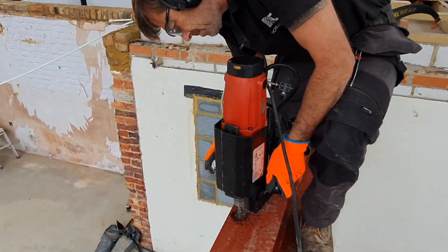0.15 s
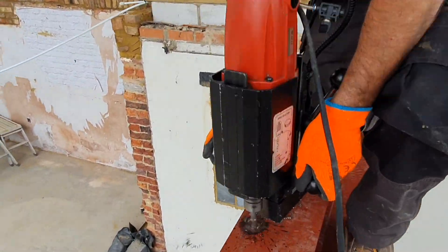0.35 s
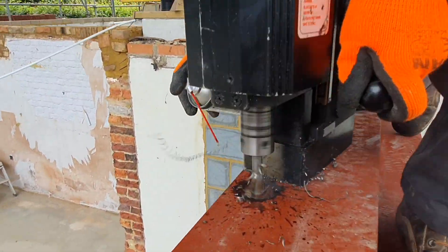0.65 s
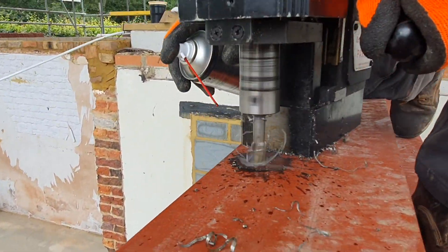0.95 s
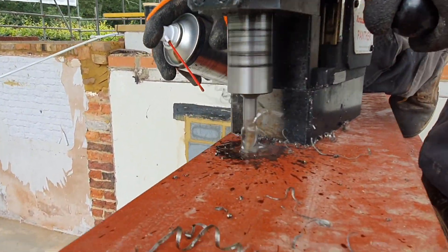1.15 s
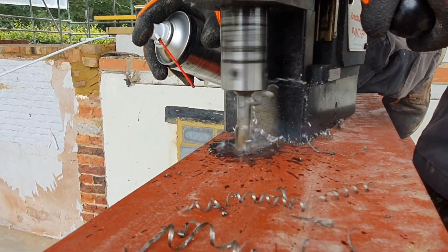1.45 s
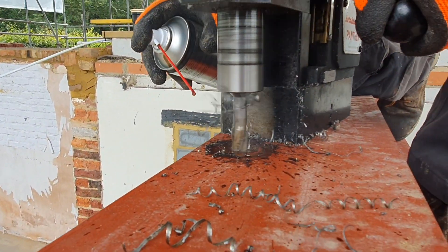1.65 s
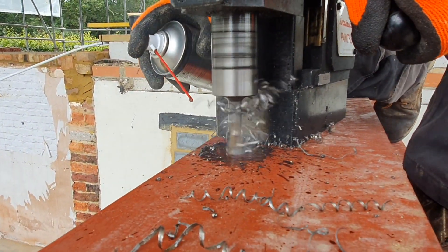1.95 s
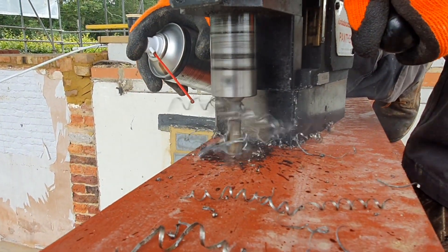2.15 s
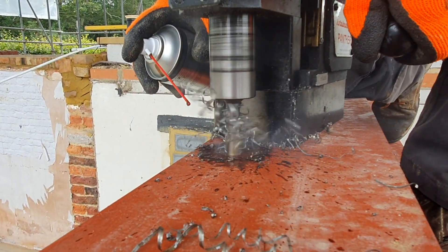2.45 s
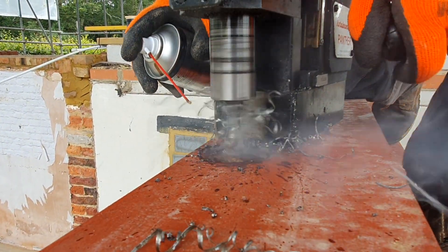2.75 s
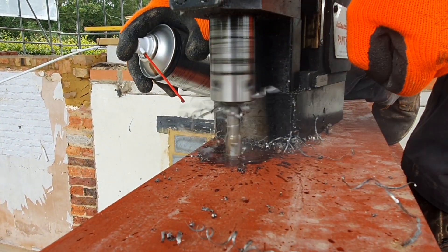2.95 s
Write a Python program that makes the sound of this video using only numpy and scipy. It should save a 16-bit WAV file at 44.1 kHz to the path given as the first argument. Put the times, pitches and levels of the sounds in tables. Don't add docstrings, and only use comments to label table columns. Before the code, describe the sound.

Magnetic drill whines loudly and steadily through a steel beam, with roaring fan and hissing cutter

```python
import sys
import numpy as np
from scipy import signal
from scipy.fft import rfft, irfft, next_fast_len
from scipy.io import wavfile
from scipy.ndimage import uniform_filter1d, map_coordinates

SR = 44100
rng = np.random.default_rng(int(sys.argv[2]) if len(sys.argv) > 2 else 0)


def unload_audio(sound):
    columns = np.transpose(np.atleast_2d(sound))
    steps = np.round(np.clip(columns, -1, 1) * 32767)
    wavfile.write(sys.argv[1], SR, steps.astype(np.int16))


def ratio_of_db(decibels):
    return 10 ** (np.asarray(decibels, float) / 20)


N = 136710

# t/s, gear mesh f/Hz
MESH_SPEED = [(0.0, 1243.0), (0.44, 1221.9), (0.54, 1202), (0.62, 1198), (0.8, 1230.5), (1.18, 1245.5),
              (1.54, 1243.1), (1.7, 1253.3), (1.92, 1229.5), (2.14, 1236.2), (2.24, 1227.3), (2.47, 1246.5),
              (2.72, 1209.5), (2.84, 1256), (2.95, 1240), (3.0, 1217), (3.05, 1262), (3.1, 1300.0)]
# t/s, feed pressure level/dB, tooth hardness level/dB
FEED_PRESSURE = [(0.0, -31, -37), (0.38, -31.5, -31), (0.56, -29, -26), (0.7, -34, -36), (0.9, -32, -35),
                 (1.36, -32.5, -36.5), (1.68, -35.5, -38), (1.85, -30, -28.5), (1.98, -33.5, -31.5),
                 (2.18, -31.5, -28), (2.46, -34, -33), (2.54, -29.5, -27), (2.72, -30.7, -25),
                 (2.79, -42, -45), (2.88, -34, -32), (2.985, -27.5, -35), (3.015, -47, -52),
                 (3.1, -45, -47)]
# order [multiples of mesh], level/dB at mean feed, share of the feed swing followed [0-1]
MESH_ORDERS = [1, 2, 3, 4, 5, 7, 8, 9, 10, 11, 12]
MESH_DB = [-35.7, -35.3, -42.5, -41.5, -33.6, -50, -48, -40.5, -33.5, -51, -49.5]
MESH_FOLLOWS = [.01, .5, .15, .12, .95, .3, .3, .2, .05, .3, .3]
# order [multiples of shaft turns], level/dB
SHAFT_ORDERS = [9, 22, 28, 30, 32, 39, 40, 42, 43, 44, 46, 49, 50, 53, 55, 57, 58, 61, 63, 71]
SHAFT_DB = [-57, -51, -57, -47, -50, -53, -45, -50, -41, -41, -45, -40, -43, -44, -47, -47, -47, -46, -50,
            -46]
# f/Hz, width/Hz, level/dB
CASING_MODES = [(8030, 160, 8.5), (8480, 130, 8)]
# f/Hz, width/Hz, level/dB
VENT_BAND = [(10850, 1400, 0)]
# f/Hz, width/Hz, level/dB
GEARBOX_MODES = [(8000, 440, -11.5), (8680, 1670, -3.5), (9320, 440, -4), (9815, 560, -1.5),
                 (11080, 580, -2.5)]
# t/s, level/dB
RATTLE_LEVEL = [
    (0, -24.5),
    (.5, -25.5),
    (1.1, -23.5),
    (1.7, -23.5),
    (2.3, -24.5),
    (2.5, -23),
    (2.75, -25.5),
    (2.98, -26),
    (3.03, -28.5),
]
# f/Hz, width/Hz, level/dB
HOUSING_MODES = [(1404, 766, -5), (2594, 1020, -1), (3764, 1840, -2), (4690, 670, 0.5), (6310, 1000, -0.5),
                 (7280, 1160, -2)]
# f/Hz, level/dB
AIR_COLOUR = [(40, -40), (200, -15), (500, -15), (1000, -5.5), (1900, -4.5), (5500, -2.5), (11000, -2),
              (16000, -5.5)]
# t/s, level/dB
SPRAY_LEVEL = [
    (0, -29),
    (.7, -29.5),
    (1.25, -28.5),
    (1.7, -27),
    (1.85, -25.5),
    (2.4, -26),
    (2.6, -25),
    (2.98, -27),
    (3.05, -29),
]
# f/Hz, level/dB
JET_COLOUR = [(9500, -28.5), (10600, -20), (11400, 6), (12500, 4.5), (14000, 2.5), (16000, -4)]
# t/s, level/dB
SCRAPE_LEVEL = [
    (0, -44),
    (2.7, -44),
    (2.82, -37.5),
    (2.93, -32),
    (3.0, -37.5),
    (3.08, -30),
]
# f/Hz, width/Hz, level/dB
FLUTE_MODES = [(1660, 900, -11), (3080, 1300, -2.5), (4500, 1300, 1.5), (6800, 1200, -10)]
# f/Hz, width/Hz, level/dB
VENT_MODES = [(6730, 1500, -6.5), (10530, 580, 1.5)]
# f/Hz, level/dB
MAGNET_HUM = [(120, -66), (240, -61)]
# t/s, low f/Hz, high f/Hz
NOISE_PATCHES = [(0.723, 7553, 8983), (0.727, 5314, 6227), (0.729, 11687, 13032), (0.798, 8931, 10362),
                 (0.798, 13841, 15874), (0.935, 6261, 7605), (0.939, 13152, 14496), (1.033, 4280, 5021),
                 (1.125, 14530, 15788), (1.195, 6347, 7605), (1.517, 4280, 5194), (1.517, 12376, 13807),
                 (1.588, 13755, 15788), (2.287, 6950, 8208), (2.933, 14530, 15788)]
# f/Hz, level/dB
MIC_RESPONSE = [(30, -54), (120, -28.5), (200, -14), (260, -5), (500, 0), (1000, 0), (20000, 0)]

MESH_PER_TURN, COUNTER_PER_MESH = 6.2, 0.03025
RUNOUT, RUNOUT_TURN = 0.27, 0.019


def unit(x):
    return x / np.sqrt(np.mean(x ** 2) + 1e-20)


def curves(rows):
    s, *columns = np.transpose(rows)
    t = np.arange(N) / SR
    return [uniform_filter1d(np.interp(t, s, c), size=800, mode="nearest") for c in columns]


def wobble(rate):
    at = np.arange(N // 32 + 2) * 32
    knots = rng.standard_normal(1000)
    return np.interp(np.arange(N), at, map_coordinates(knots, [at * min(rate, 300) / SR]))


def slope(points):
    f, db = np.transpose(points)
    return lambda hz: ratio_of_db(np.interp(np.log(hz + 1), np.log(f), db))


def bells(peaks):
    return lambda f: np.sqrt(sum(ratio_of_db(2 * db) / (1 + ((f - c) * 2 / w) ** 2) ** 2 for c, w, db in peaks))


def filtered(x, response):
    m = next_fast_len(N + 8192)
    return irfft(rfft(x, m) * response(np.fft.rfftfreq(m, 1 / SR)), m)[..., :N]


def rush(response, patchy_db, gate=1):
    z = signal.stft(rng.standard_normal(N), nperseg=512)[2]
    field = uniform_filter1d(rng.standard_normal(z.shape), size=6, axis=0)
    field = uniform_filter1d(field, size=14, axis=1)
    noise = signal.istft(z * ratio_of_db(patchy_db * unit(field)), nperseg=512)[1][:N]
    return unit(filtered(gate * noise, response))


def whine(mesh, mesh_hz, feed_db, hard_db, rattle_db, beat):
    tones = list(zip(MESH_ORDERS, MESH_DB, MESH_FOLLOWS))
    tones += [(k / MESH_PER_TURN, db, 0.11) for k, db in zip(SHAFT_ORDERS, SHAFT_DB)]
    vent_fade_db = 4.5 * (np.arange(N) - N / 2) / SR
    out = np.zeros(N)
    for order, db, follows in tones:
        high = min(order / 5, 1)
        hz = order * mesh_hz
        level_db = db + follows * feed_db + high * 1.2 * wobble(14)
        if order == 10:
            level_db = level_db + hard_db + 2.2 * wobble(110)
        elif order > MESH_PER_TURN:
            level_db = level_db + 0.5 * rattle_db - bells(VENT_BAND)(hz) * vent_fade_db
        level = ratio_of_db(level_db) * (1 + RUNOUT * high ** 2 * beat)
        level = level * np.hypot(1, bells(CASING_MODES)(hz))
        blurred = mesh + 0.016 * wobble(40.2)
        out += level * np.sqrt(2) * np.sin(order * blurred + rng.uniform(0, 2 * np.pi))
    return out


def rattle(level_db, beat):
    swing_db = 1.0 * beat * (0.5 + 0.34 * wobble(4.4))
    spike_db = 0.5 * wobble(200)
    return ratio_of_db(level_db - 2.0) * rush(bells(GEARBOX_MODES), patchy_db=0.05, gate=ratio_of_db(swing_db + spike_db))


def fan(feed_db):
    roar = ratio_of_db(-28 - 0.04 * feed_db) * rush(bells(HOUSING_MODES), patchy_db=0.58)
    air = ratio_of_db(-31.5) * rush(slope(AIR_COLOUR), patchy_db=-0.8)
    return roar + air


def spray():
    level_db, = curves(SPRAY_LEVEL)
    return ratio_of_db(level_db + 2 + 0.43 * wobble(10.74)) * rush(slope(JET_COLOUR), patchy_db=0.3)


def scrape():
    level_db, = curves(SCRAPE_LEVEL)
    grit = ratio_of_db(2.7 * wobble(150))
    return ratio_of_db(level_db) * rush(bells(FLUTE_MODES), patchy_db=3.5, gate=grit)


def vent():
    level_db = -31 - 3.5 * np.arange(N) / SR
    return ratio_of_db(level_db) * rush(bells(VENT_MODES), patchy_db=0.3)


def magnet():
    t = np.arange(N) / SR
    return sum(ratio_of_db(db + 0.2 * wobble(8)) * np.sqrt(2) * np.sin(2 * np.pi * hz * t) for hz, db in MAGNET_HUM)


def scene():
    mesh_hz, = curves(MESH_SPEED)
    rattle_db, = curves(RATTLE_LEVEL)
    feed_db, hard_db = (c - c.mean() for c in curves(FEED_PRESSURE))
    mesh = 2 * np.pi * np.cumsum(mesh_hz) / SR
    beat = np.cos(COUNTER_PER_MESH * mesh + 2 * np.pi * RUNOUT_TURN)
    mono = whine(mesh, mesh_hz, feed_db, hard_db, rattle_db - rattle_db.mean(), beat)
    mono = mono + rattle(rattle_db, beat) + fan(feed_db)
    mono = mono + spray() + scrape() + vent() + magnet()
    return np.array([mono, mono])


def noise_patches(x):
    out, span, patch_s = x.copy(), 4096, 0.022
    hz = np.fft.rfftfreq(span, 1 / SR)
    t = (np.arange(span) - span // 2) / SR
    fade = np.clip(1.5 - abs(t) * 2 / patch_s, 0, 1) ** 2
    for s, low_hz, high_hz in NOISE_PATCHES:
        start = round(s * SR) - span // 2
        at = slice(start, start + span)
        band = (hz > low_hz) & (hz < high_hz)
        part = irfft(rfft(x[:, at]) * band)
        noise = unit(irfft(rfft(rng.standard_normal((2, span))) * band))
        noise = ratio_of_db(1) * part.std() * noise
        out[:, at] += np.sqrt(1 - (1 - fade) ** 2) * noise - fade * part
    return out


def low_pass(x):
    return signal.sosfilt(signal.butter(12, 16400, fs=SR, output="sos"), x)


def record(dry):
    heard = filtered(dry, lambda hz: slope(MIC_RESPONSE)(hz) * (hz < 15780))
    mix = noise_patches(heard)
    return low_pass(mix)


dry = scene()
out = record(dry)
unload_audio(out)
```